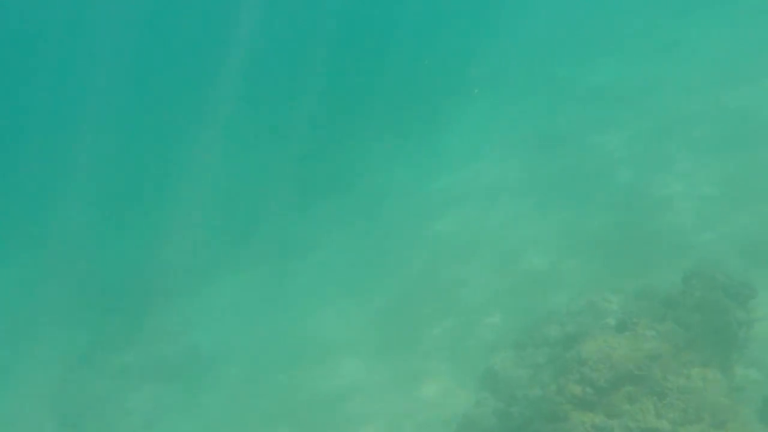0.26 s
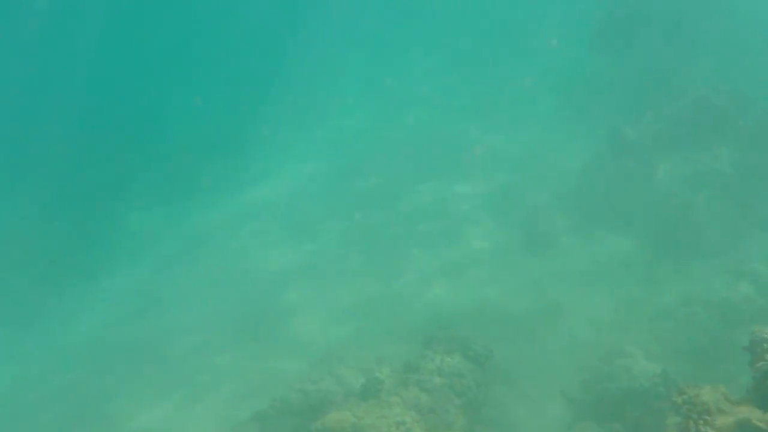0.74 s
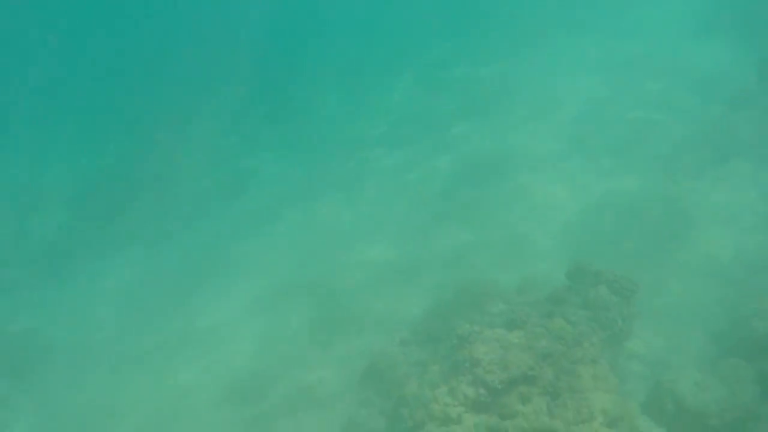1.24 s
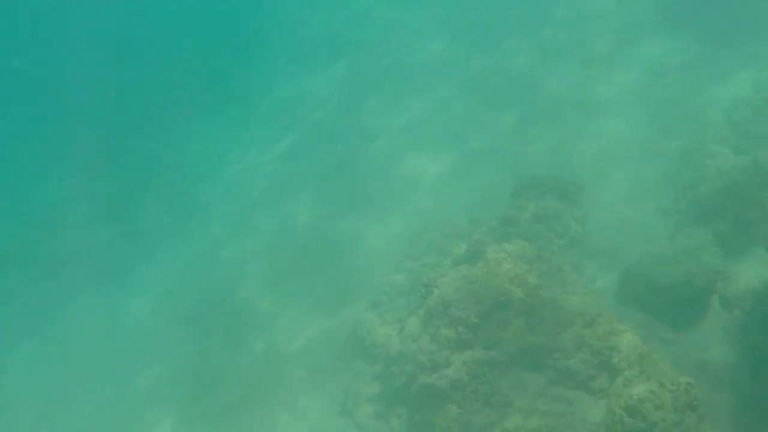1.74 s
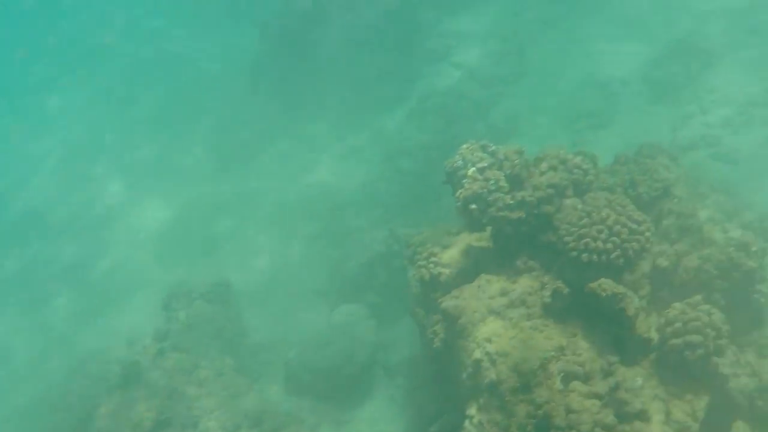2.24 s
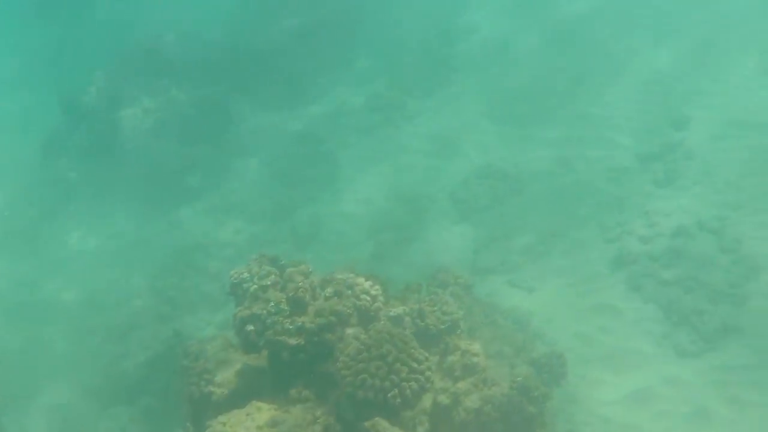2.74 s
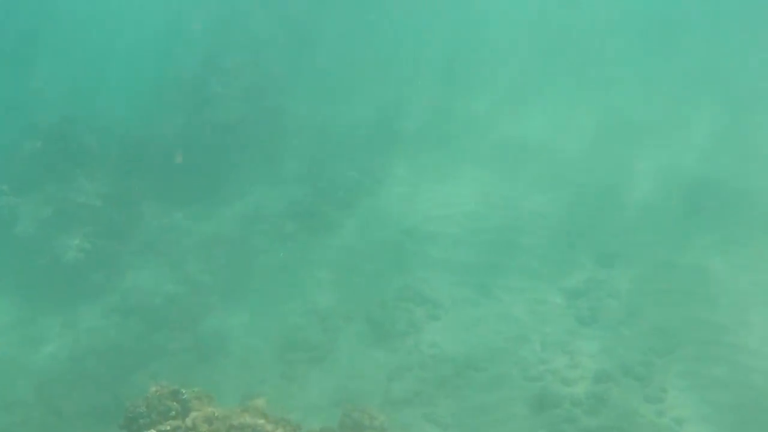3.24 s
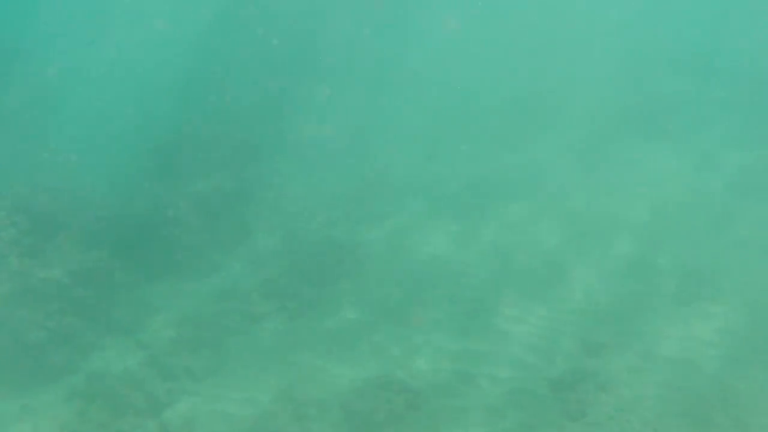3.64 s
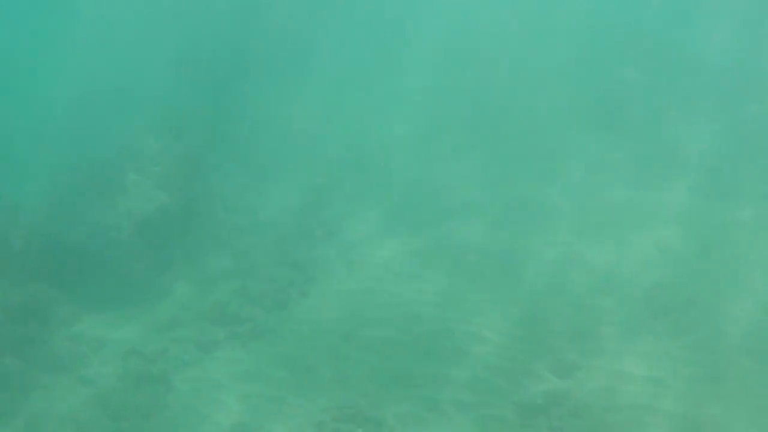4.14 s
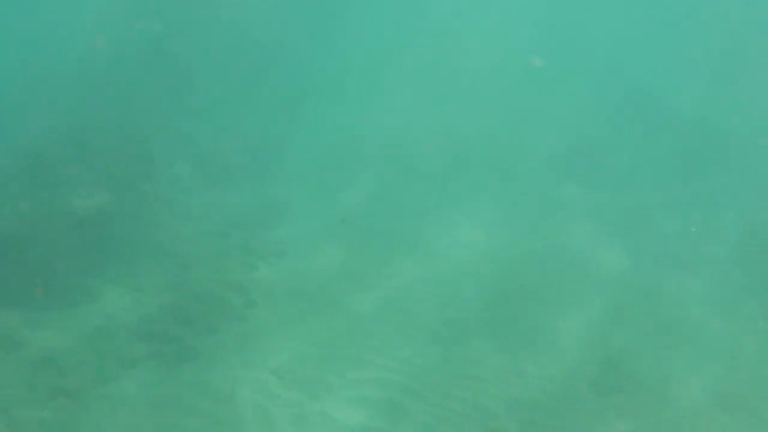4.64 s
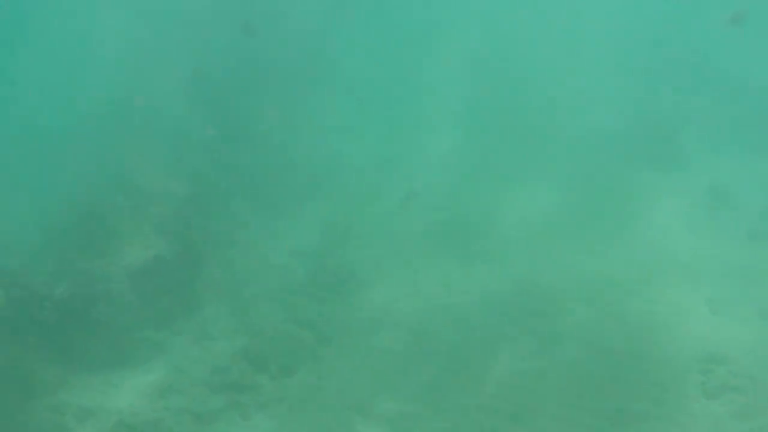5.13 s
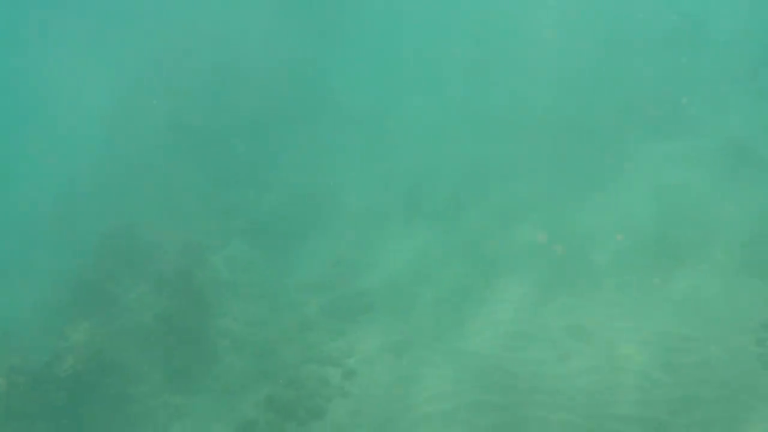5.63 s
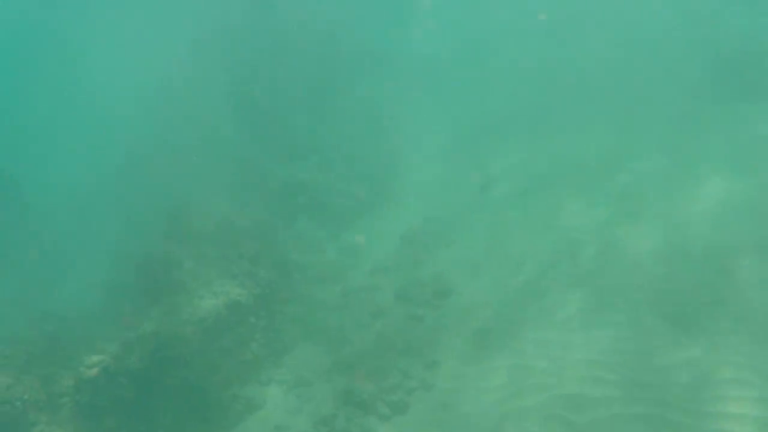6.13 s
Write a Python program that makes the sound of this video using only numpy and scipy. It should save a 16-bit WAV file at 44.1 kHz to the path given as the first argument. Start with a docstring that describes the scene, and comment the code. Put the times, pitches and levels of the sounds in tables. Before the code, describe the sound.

Underwater at a reef, heard from inside a small plastic camera housing: low uneven water surge, a soft muffled rush and a thin distant shrimp crackle throughout. Sparse housing ticks grow sharper and denser from two to nearly four seconds, with low bubble bloops. After a calmer second, deep thumps, hard knocks and brief rubbing strokes strike from five seconds, loudest near five and a half, with another hit near the end.

```python
"""Water surges and rushes round a small camera's plastic housing over a reef, shrimp crackling far off.
Near shrimp snap singly, the housing ticks and creaks, soft bumps rock it, bubbles bloop, the shell rings faintly.
Later a hand slides on the shell in short strokes and dull knocks land on it.
Water, far shrimp and rubs are shaped noise; ticks and knocks ring shell modes; near snaps are noise bursts;
bumps, bubbles and faint rings are dying sines. The sum is softly rounded and loses its top at the microphone."""
import sys
import numpy as np
from scipy import signal
from scipy.fft import rfft, irfft, next_fast_len
from scipy.io import wavfile
from scipy.ndimage import uniform_filter1d

SR = 44100
rng = np.random.default_rng(int(sys.argv[2]) if len(sys.argv) > 2 else 0)


def to_wav(s):
    """Save 16-bit WAV."""
    ch = np.atleast_2d(s).T  # columns
    pcm = np.round(np.clip(ch, -1, 1) * 32767)  # PCM
    wavfile.write(sys.argv[1], SR, pcm.astype(np.int16))


N = 281358   # length in samples


def from_db(db):
    """Gain of a level in dB."""
    return 10 ** (np.asarray(db) / 20)


def rms_one(x):
    """Scale to rms 1."""
    return x / np.sqrt(np.mean(x ** 2) + 1e-20)


def bandpass(x, band_hz, order=2):
    """Keep what lies between two frequencies in Hz."""
    return signal.sosfilt(signal.butter(order, band_hz, "band", fs=SR, output="sos"), x)


def in_time(rows):
    """Columns of a curve, one value a sample; silent outside its span."""
    s, *columns = np.transpose(rows)
    return [np.interp(np.arange(N) / SR, s, c, left=-120, right=-120) for c in columns]


def drift(rate_hz):
    """Random wander of rms 1: noise smoothed by two equal low-passes, computed every 40 samples."""
    pole = np.exp(-80 * np.pi * rate_hz / SR)
    noise = rng.standard_normal(N // 40 + 2002)
    slow = signal.lfilter([1], [1, -2 * pole, pole * pole], noise)[2000:]   # drop the settling
    return np.interp(np.arange(N) / 40, np.arange(len(slow)), rms_one(slow))


def colour(x, spectrum, peaks=()):
    """Shape by a spectrum and resonances, with minimum phase so that nothing sounds early."""
    size = next_fast_len(N + 8192)
    hz = np.maximum(np.arange(size // 2 + 1) * SR / size, 1)
    points = np.array(spectrum)
    gain = from_db(np.interp(np.log(hz), np.log(points[:, 0]), points[:, 1]))
    for peak_hz, width_hz, peak_db in peaks:
        detuning = 2 * (hz - peak_hz) / width_hz
        gain = gain * np.sqrt(1 + from_db(2 * peak_db) / (1 + detuning ** 2))
    # folding the cepstrum onto positive time gives minimum phase
    cepstrum = irfft(np.log(gain), size)
    cepstrum[1:size // 2] *= 2
    cepstrum[size // 2 + 1:] = 0
    return irfft(rfft(x, size) * np.exp(rfft(cepstrum)), size)[:N]


def ring(force, hz, t60):
    """A mode as a two-pole resonator: a unit click starts a sine of height about 1, down 60 dB after t60 s."""
    radius, angle = from_db(-60 / (t60 * SR)), 2 * np.pi * hz / SR
    poles = [1, -2 * radius * np.cos(angle), radius * radius]
    return signal.lfilter([0, np.sin(angle)], poles, force + 1e-18)


def swells(length_s):
    """One row of noise an event, swelling and dying within about its length, with a faint ragged tail."""
    t = np.arange(2048) / SR / np.reshape(length_s, (-1, 1))   # in event lengths
    envelope = t * (np.exp(-4.0 * t) + 0.038 * np.exp(-1.1 * t))
    return rng.standard_normal(t.shape) * envelope


def place(times, levels_db, sounds):
    """Lay the rows out in time, each scaled so that its loudest 2 ms have the given level."""
    out, size = np.zeros(N + 2048), sounds.shape[1]
    loudest = np.sqrt(uniform_filter1d(sounds ** 2, size=88, axis=1).max(axis=1))
    for s, gain, sound in zip(times, from_db(levels_db) / loudest, sounds):
        start = round(s * SR)
        out[start:start + size] += gain * sound
    return out[:N]


# Water close round the housing. Each row: time in seconds, surge level in dB, rush level in dB.
WATER_LEVELS = [(0, -34.5, -49.5), (0.85, -34, -48), (1.25, -35.5, -52.5), (1.7, -32.5, -53),
                (2.1, -28.5, -54.5), (2.7, -30.5, -43.5), (3.1, -26.5, -42), (3.5, -31, -45.5),
                (3.9, -35, -46.5), (4.1, -33, -58.5), (4.7, -33.5, -48), (4.95, -32.5, -49.5),
                (5.35, -20, -44.5), (5.56, -25.5, -47), (6.2, -27, -42), (6.38, -27, -37)]
# Balance of the low surge. Each row: frequency in Hz, relative density in dB per Hz.
SURGE_SPECTRUM = [(11, -18), (28, 4), (62, -4.5), (110, -23.5), (200, -38.5), (500, -120)]
# Balance of the rush above it. Each row: frequency in Hz, relative density in dB per Hz.
RUSH_SPECTRUM = [(90, -17.5), (160, -2.5), (300, -6), (480, -2), (620, 3), (950, -19.5), (1400, -23),
                 (2500, -57)]


def water():
    """Lumpy pressure surges below, a patchy rush above that wakes the lowest shell mode."""
    surge_db, rush_db = in_time(WATER_LEVELS)
    surge = colour(rng.standard_normal(N), SURGE_SPECTRUM) * from_db(2.0 * drift(8.6))
    patches = rng.standard_normal(N) * from_db(4.07 * drift(19.5))
    rush = colour(patches, RUSH_SPECTRUM)
    return from_db(surge_db) * rms_one(surge) + from_db(rush_db) * rms_one(rush)


# The far colony's balance. Each row: frequency in Hz, relative density in dB per Hz.
FAR_SPECTRUM = [(700, -1), (1300, -9), (1800, -4), (2100, 0), (5200, -5), (9900, -10), (10700, -16),
                (15100, -14.5), (15800, -48)]
# Shell resonances that steady sound passes. Each row: frequency in Hz, width in Hz, strength in dB.
STEADY_SHELL_PEAKS = [(1460, 60, 11), (1980, 200, 7), (2950, 300, 6), (3800, 300, 4)]
FAR_SNAPS_PER_S = 55   # in each colour band, before flurries
FAR_CLUMPS_DB, FAR_SPREAD_DB, FAR_OVER_HISS_DB = 5, 4.5, 6.5   # flurries, snap sizes, crackle over hiss


def far_shrimp():
    """The far colony is a crackle of uneven sizes and colours melting into hiss, heard through the shell."""
    crackle, smear_pole = 0, np.exp(-1 / (0.0016 * SR))   # echoes off the coral smear each snap
    rate = FAR_SNAPS_PER_S * from_db(FAR_CLUMPS_DB * drift(12.0))   # the colony snaps in flurries
    # some snaps only wake a shell mode; distance and angle colour the others
    bands = [[hz / 1.06, hz * 1.083] for hz, *_ in STEADY_SHELL_PEAKS[1:]]
    bands += [[1000, 19600]]
    bands += [[hz, 2.4 * hz] for hz in np.geomspace(1800, 8500, len(STEADY_SHELL_PEAKS))]
    for band_hz in bands:
        sizes = from_db(FAR_SPREAD_DB * np.minimum(rng.exponential(1, N), 3.5))
        snaps = sizes * (rng.random(N) < rate / SR)
        smeared = signal.lfilter([1], [1, -smear_pole], snaps) * rng.standard_normal(N)
        crackle = crackle + bandpass(smeared, band_hz)
    hiss = rng.standard_normal(N) * from_db(0.64 * drift(16.0))
    colony = from_db(FAR_OVER_HISS_DB) * rms_one(crackle) + hiss
    return from_db(-54.0) * rms_one(colour(colony, FAR_SPECTRUM, STEADY_SHELL_PEAKS))


# Slips in the plastic at the microphone. Each row: start in seconds, level of the middle modes
# over the loudest 2 ms in dB, slip length in ms.
HOUSING_TICKS = [(0.061, -26.5, 3.7), (0.075, -28, 1.1), (0.085, -32.5, 3.5), (0.402, -30, 3.1),
                 (0.414, -19.5, 2.7), (0.747, -25.5, 5.6), (0.762, -20.5, 5), (1.306, -24.5, 2.4),
                 (1.313, -14.5, 4.2), (1.324, -24, 2.9), (1.74, -41, 7.5), (1.874, -16, 2.2),
                 (1.89, -36, 1.7), (2.072, -16.5, 2.8), (2.2521, -8, 5.4), (2.285, -18, 4.5),
                 (2.325, -36, 5.3), (2.417, -39, 7.4), (2.558, -30.5, 11), (2.593, -30, 8.2),
                 (2.613, -19, 3.5), (2.75, -12, 4.8), (2.802, -17.5, 0.96), (2.915, -23.5, 4.7),
                 (2.988, -20.5, 1.7), (3.03, -11.5, 5.3), (3.196, -23.5, 5.5), (3.313, -31.5, 3.6),
                 (3.372, -17, 0.64), (3.382, -22, 0.82), (3.508, -19.5, 1.6), (3.518, -14.5, 0.91),
                 (3.602, -16.5, 5), (3.611, -10.5, 3.9), (4.687, -30, 0.61), (4.731, -17, 2.74),
                 (4.824, -34.5, 4.5), (4.929, -34.5, 1.4), (5.113, -21.5, 2.8), (5.12, -11.5, 3.9),
                 (5.142, -20.5, 0.82), (5.396, -25, 5.2), (5.445, -6, 2.1), (5.492, -22.5, 5.7),
                 (5.606, -42, 14), (6.216, -31, 2.2), (6.221, -6.5, 0.67), (6.293, -30, 1.7),
                 (6.312, -32, 9.8), (6.347, -34.5, 1.3)]
# Modes of the struck shell, low to high. Each row: frequency in Hz, relative level in dB, 60 dB decay in s.
SHELL_MODES = [(626, -1.5, 0.024), (788, -7.5, 0.01), (942, -5.5, 0.016), (1510, -11.5, 0.018),
               (1820, 3, 0.0074), (2184, -8.5, 0.017), (2603, 1.5, 0.0073), (3470, 20, 0.0037),
               (4160, 18.5, 0.0058), (5140, 9, 0.013)]
DULL_DB, DULL_PER_DB = -14.5, -0.31   # low modes re the middle ones at full scale; soft ticks are duller


def ticks():
    """A slip in the plastic lasts some milliseconds and drives every mode in its own way."""
    s, level_db, length_ms = np.transpose(HOUSING_TICKS)
    modes = [from_db(db) * ring(swells(length_ms / 1000), hz, t60) for hz, db, t60 in SHELL_MODES]
    no_edge = signal.butter(4, 3300, fs=SR, output="sos")
    no_thump = signal.butter(2, 450, "high", fs=SR, output="sos")
    soft = np.vstack([no_edge, no_thump])
    dull, middle = signal.sosfilt(soft, [sum(modes[:3]), sum(modes[3:7])])
    bright = bandpass(sum(modes[7:]), [3000, 7500])
    dull_db = DULL_DB + DULL_PER_DB * level_db
    bright_db = -25.0 + 1.07 * length_ms   # long slips are brighter
    low_and_middle = place(s, level_db + dull_db, dull) + place(s, level_db, middle)
    return low_and_middle + place(s, level_db + bright_db, bright)


# Soft pushes on the whole housing. Each row: start in seconds, peak of the rocking in dB, pitch in Hz.
SOFT_BUMPS = [(0.094, -27, 69.5), (1.498, -31, 64), (5.041, -11.5, 60.3), (5.062, -15.5, 79),
              (5.087, -1.5, 57.7), (5.116, -6, 54), (5.273, -3, 50), (5.452, -3, 62), (5.491, -8.5, 57),
              (5.611, -10, 51.4), (5.83, -21, 61), (5.979, -14, 39), (6.271, -2.5, 57.6),
              (6.305, -13, 43.3)]


def bumps():
    """The whole housing rocks for a cycle or two after a soft push, and the grip grinds as it gives."""
    out, t = np.zeros(N + 8192), np.arange(8192) / SR
    for s, peak_db, hz in SOFT_BUMPS:
        swing = (1 - np.exp(-t / 0.0046)) ** 3 * from_db(-60 * t * hz / 4.65)
        rock = np.sin(2 * np.pi * hz * t - 2.5) * swing   # a dip, a crest, a trough
        start = round(s * SR)
        out[start:start + 8192] += from_db(peak_db) * rock / np.max(np.abs(rock))
    rocking = out[:N]
    push = np.roll(np.abs(rocking), -round(0.0081 * SR))   # the grinding leads the swing
    grind = bandpass(rng.standard_normal(N), [110, 480], order=3)
    return rocking + from_db(-24.5) * push * rms_one(grind)


# Shrimp close by. Each row: start in seconds, body level in dB, treble level in dB, over the loudest 2 ms.
NEAR_SNAPS = [(0.166, -33, -69), (0.475, -25, -38), (0.741, -28.5, -47), (0.845, -36, -71),
              (0.918, -36.5, -73), (1.054, -36, -52), (1.35, -38, -38), (1.397, -38, -39),
              (1.497, -30.5, -39.5), (2.219, -41, -48), (2.38, -40, -45), (2.653, -41.5, -69),
              (2.848, -27.5, -65), (4.045, -38, -44), (4.099, -41, -56), (4.495, -37, -54),
              (5.36, -36, -65), (5.445, -19, -28.5), (5.488, -29, -41), (5.502, -34.5, -61),
              (5.547, -45, -65), (5.947, -33.5, -68), (5.989, -25, -56), (6.069, -34.5, -58)]


def near_shrimp():
    """Each near snap stands alone: a short noise burst in the body and a shorter one in the treble."""
    s, body_db, treble_db = np.transpose(NEAR_SNAPS)
    body = bandpass(swells(np.full(len(s), .0025)), [1900, 4800])
    treble = bandpass(swells(np.full(len(s), .0015)), [7000, 15000])
    return place(s, body_db, body) + place(s, treble_db, treble)


# Bubbles escaping from the housing, and faint rings of the shell near 1100 and 1450 Hz. Each row: start
# in seconds, level in dB before its fades and waver, starting pitch in Hz before its sway.
BUBBLES_AND_SHELL_RINGS = [(1.972, -44, 1490), (1.985, -27.5, 620), (2.003, -46, 1450), (2.8, -27, 375),
                           (2.825, -27, 140), (2.885, -32, 323), (2.935, -26, 377), (2.955, -24, 142),
                           (3.016, -24, 505), (3.065, -33, 494), (3.15, -30, 165), (3.255, -34, 192),
                           (3.716, -50, 1430), (3.826, -39, 723), (3.852, -51, 1420), (3.862, -50, 1110),
                           (4.1, -41.5, 700), (5.061, -18, 195.4), (5.08, -24.5, 308), (6.33, -23, 365)]


def bubbles_and_shell_rings():
    """Each bubble or faint shell ring is a sine that starts softly, wavers, rises a little and dies away."""
    out, waver = 0, from_db(4 * drift(80.0))
    # all sway in pitch together; for the bubbles it is the water squeezing them
    wander = np.cumsum(0.035 * drift(23.5)) / SR
    for s, level_db, hz in BUBBLES_AND_SHELL_RINGS:
        cycles = hz * np.clip(np.arange(N) / SR - s, 0, .3)
        decay = from_db(level_db - 60 * cycles / (12.6 + 0.09 * hz))   # higher ones ring more cycles
        onset = 1 - np.exp(-cycles / 2.0)
        rising = cycles * (1 + 0.00081 * cycles)
        out = out + decay * onset * np.sin(2 * np.pi * (rising + hz * wander))
    return out * waver


# A hand slides on the shell. Each row: start in seconds, length in seconds, level at the end in dB.
HAND_RUBS = [(5.075, 0.11, -31), (5.456, 0.03, -30.5), (5.673, 0.17, -32.5), (5.939, 0.0089, -33.5),
             (6.282, 0.038, -32)]
# Balance of the friction. Each row: frequency in Hz, relative density in dB per Hz.
RUB_SPECTRUM = [(150, 8.5), (600, -6.5), (1200, -11), (3300, -20), (5600, -31.5), (10000, -76)]
# The one shell mode the hand wakes: frequency in Hz, width in Hz, strength in dB.
RUBBED_MODE = (2880, 510, 12.7)
RUB_SWELL_DB_PER_S, RUB_ATTACK_DB_PER_S, RUB_RELEASE_DB_PER_S = 69, 590, 462


def rub():
    """Skin on plastic: grainy friction noise that swells through each stroke and wakes one shell mode."""
    t, stroke = np.arange(N) / SR, 0
    for s, length, end_db in HAND_RUBS:
        early, late = np.clip(s - t, 0, 1), np.clip(t - s - length, 0, 1)
        below_end_db = RUB_SWELL_DB_PER_S * np.clip(s + length - t, 0, length)
        edges_db = RUB_ATTACK_DB_PER_S * early + RUB_RELEASE_DB_PER_S * late
        stroke = stroke + from_db(end_db - below_end_db - edges_db)
    grains = rng.standard_normal(N) * from_db(2.8 * drift(69.0))
    return stroke * rms_one(colour(grains, RUB_SPECTRUM, [RUBBED_MODE]))


# Dull knocks on the shell. Each row: start in seconds, level over the loudest 2 ms in dB.
SHELL_KNOCKS = [(5.125, -18), (5.141, -20.5), (5.416, -25), (5.4455, 1.5), (5.4636, -11.5), (5.483, -22),
                (5.4933, -17.5), (5.604, -29.5), (6.221, -12.5), (6.293, -17.5), (6.312, -25.5)]
KNOCK_S = 0.0011   # contact time, varied a little from knock to knock


def knocks():
    """A soft contact wakes only the three lowest modes of the shell."""
    s, level_db = np.transpose(SHELL_KNOCKS)
    contact_s = KNOCK_S * rng.uniform(0.87, 1.12, (len(s), 1))
    phase = np.clip(np.arange(2048) / SR / contact_s, 0, 1)
    force = -np.sin(2 * np.pi * phase)   # a push and its rebound
    ringing = sum(from_db(db) * ring(force, hz, t60) for hz, db, t60 in SHELL_MODES[:3])
    return place(s, level_db, ringing)


def scene():
    """All sources, in one channel."""
    surroundings = water() + far_shrimp() + near_shrimp()
    housing = ticks() + bumps() + bubbles_and_shell_rings() + rub() + knocks()
    return (surroundings + housing)[None]


CUTOFF_HZ = 16500   # 60 dB down from here up


def record(dry):
    """The loudest peaks are rounded, the top is cut."""
    rounded = 1.099 * np.tanh(dry / 1.055)
    return signal.sosfilt(signal.cheby2(12, 60, CUTOFF_HZ, fs=SR, output="sos"), rounded)


dry = scene()
out = record(dry)
to_wav(out)
```